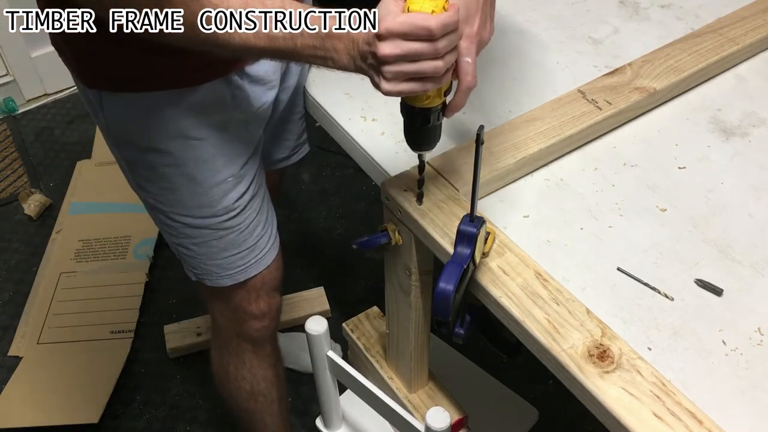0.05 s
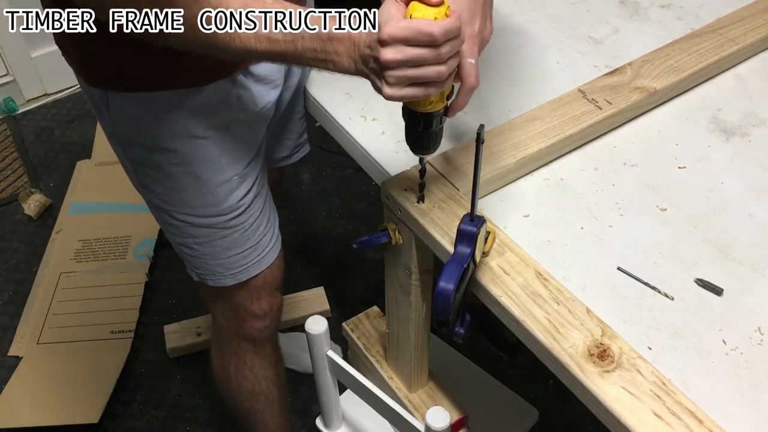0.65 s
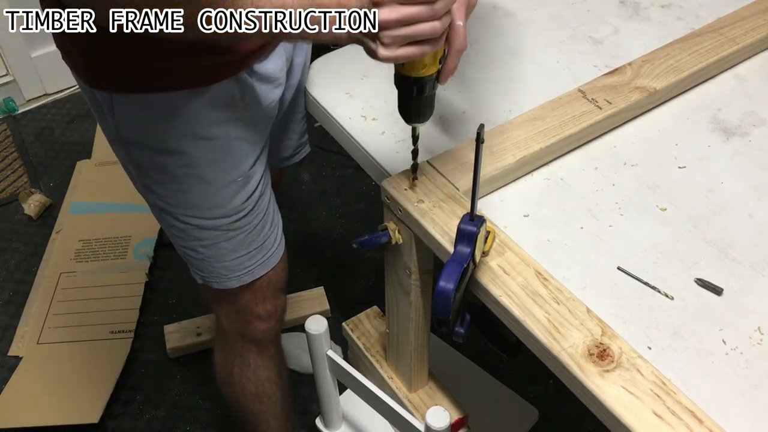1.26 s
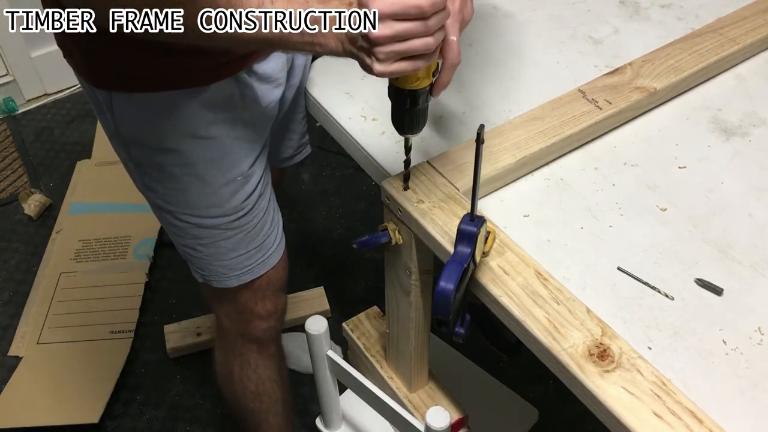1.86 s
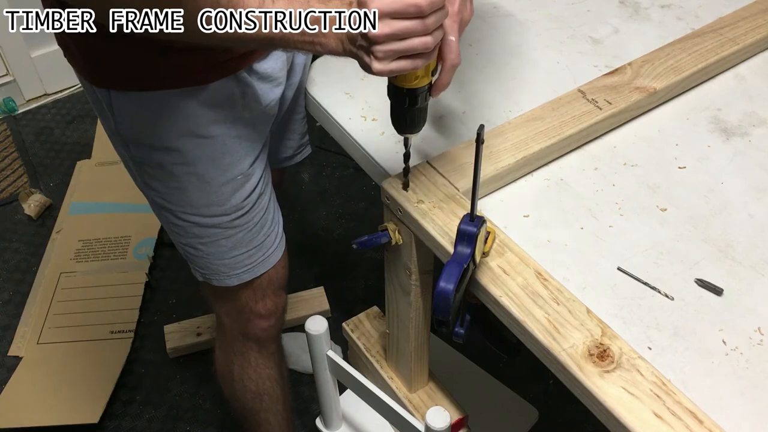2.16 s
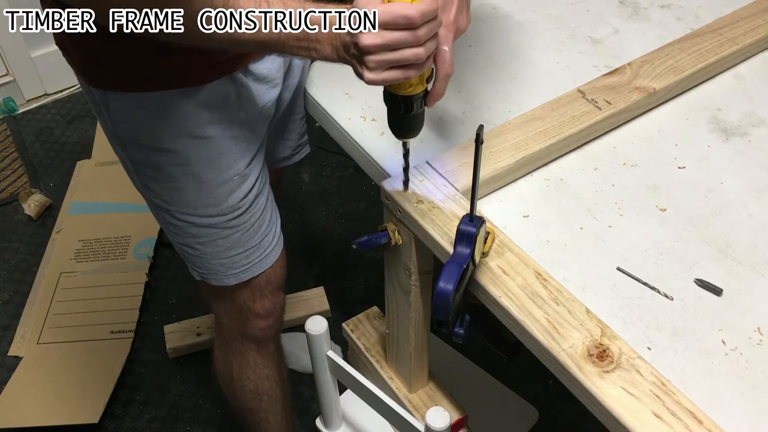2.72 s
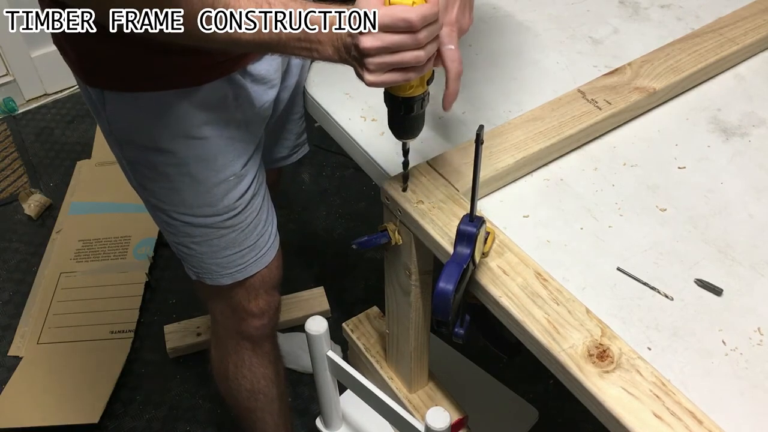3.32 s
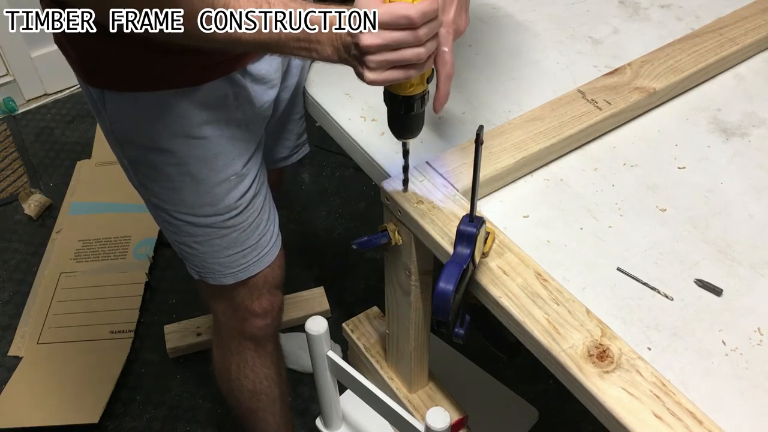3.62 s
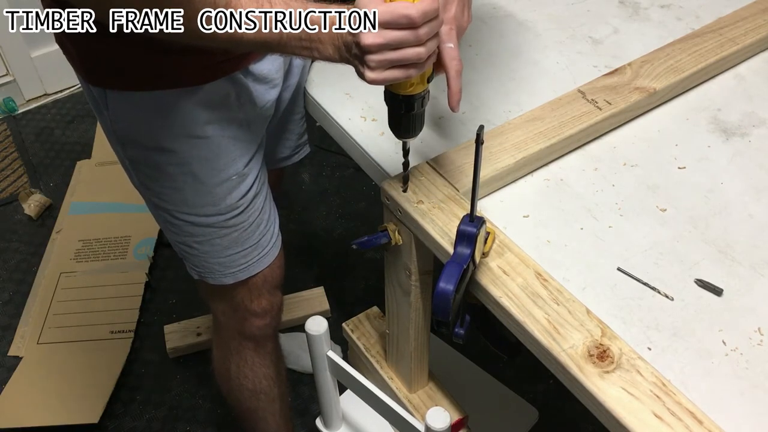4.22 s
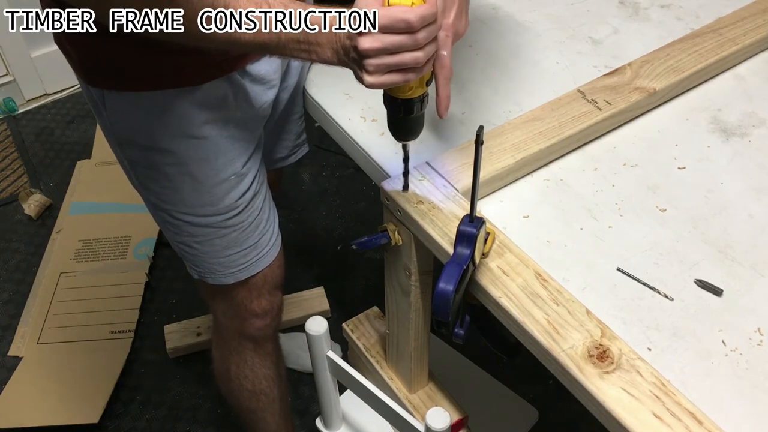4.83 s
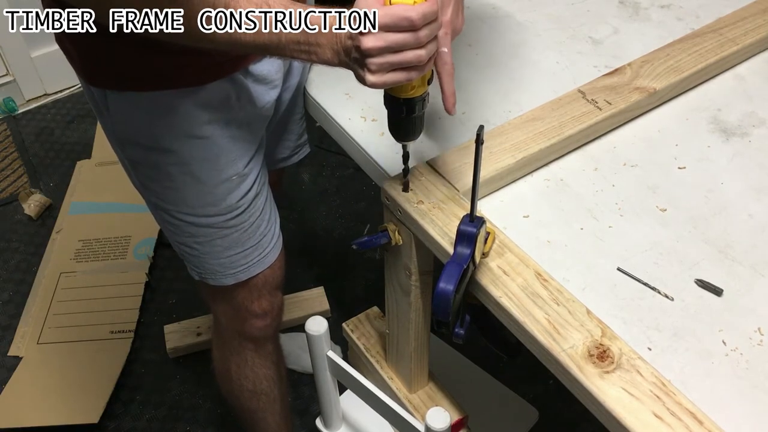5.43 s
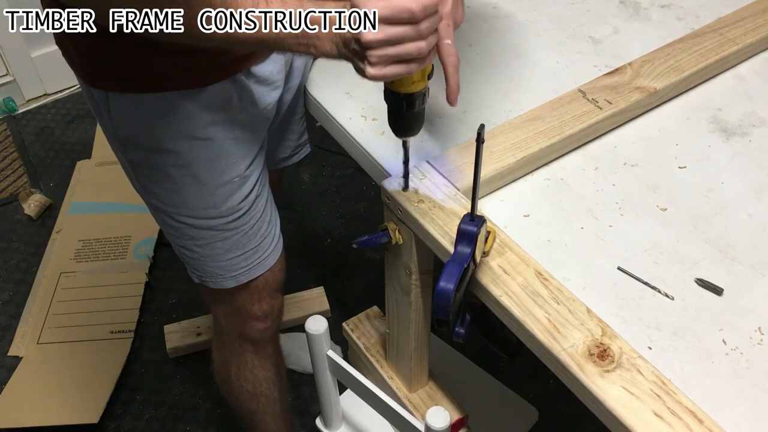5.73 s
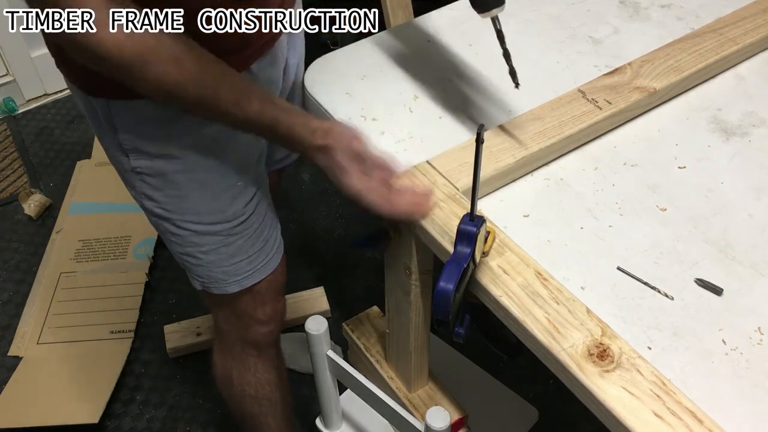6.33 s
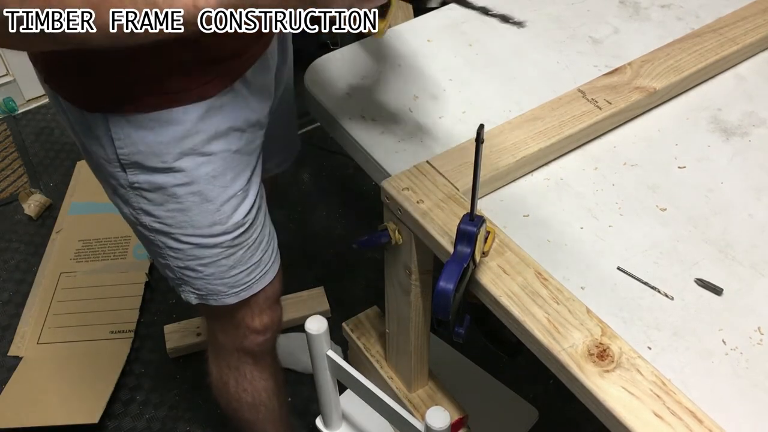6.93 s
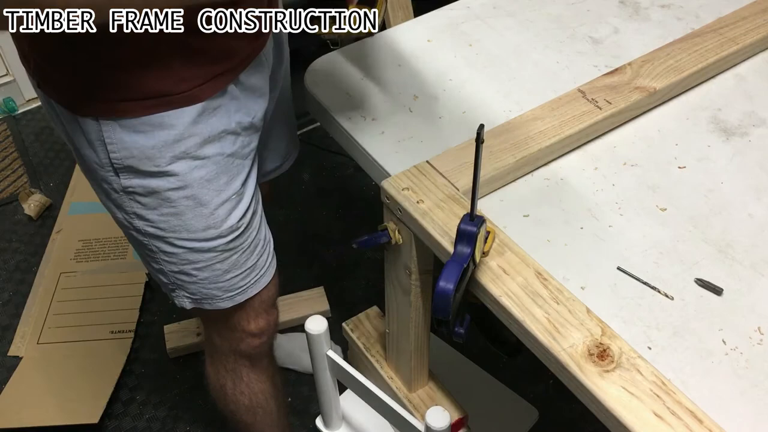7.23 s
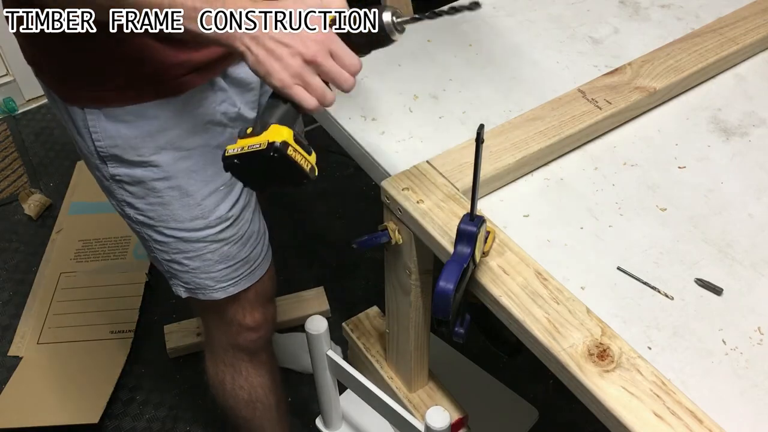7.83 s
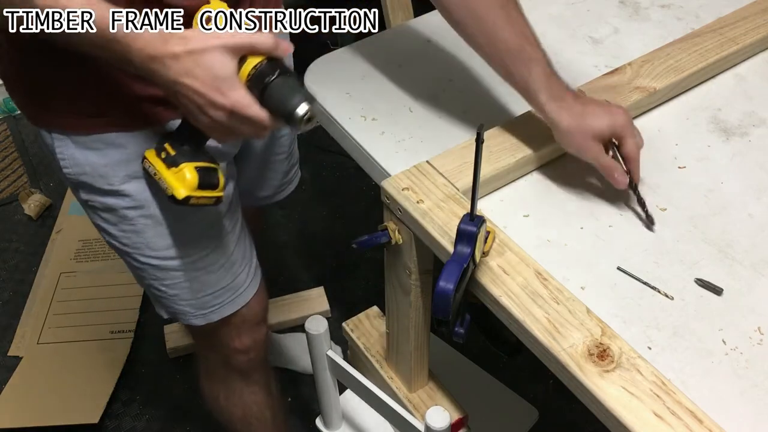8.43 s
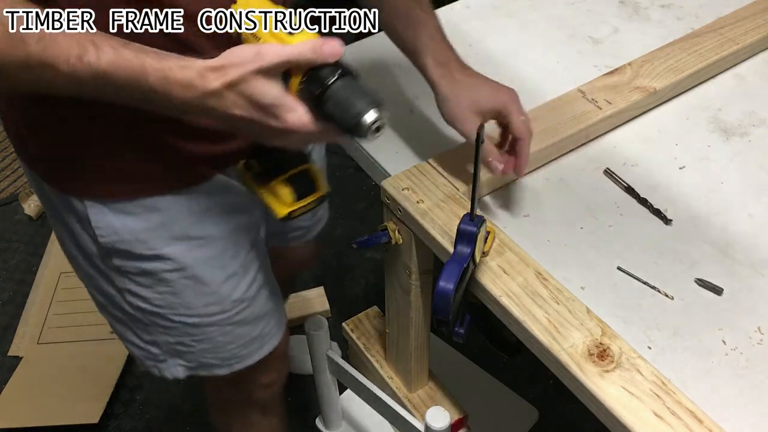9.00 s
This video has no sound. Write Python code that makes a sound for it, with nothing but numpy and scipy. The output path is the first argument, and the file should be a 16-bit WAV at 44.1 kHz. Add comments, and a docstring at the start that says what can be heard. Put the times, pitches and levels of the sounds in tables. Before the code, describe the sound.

A cordless drill whines in short bursts into wood, then its chuck clicks and a steel bit knocks loudly onto a hollow table.

```python
"""A cordless drill whines up close by, countersinking a timber frame clamped to a hollow work table.
Twelve short trigger pulls spin the motor up and let it run down: the gears sing and rattle, and the bit
chatters in the wood and snags twice. Soft noise swells, the chuck clicks loose, and the steel bit is put
down with a loud knock that sets the table booming. One microphone, in a small, live workshop."""
import sys
import numpy as np
from scipy import signal
from scipy.fft import rfft, irfft
from scipy.io import wavfile

SR = 44100
rng = np.random.default_rng(int(sys.argv[2]) if len(sys.argv) > 2 else 0)


def store_pcm(level_fs):
    """Save levels as 16-bit WAV."""
    pcm = np.round(np.clip(level_fs, -1, 1) * 32767).astype(np.int16)
    wavfile.write(sys.argv[1], SR, np.atleast_2d(pcm).T)


N = 399546
T = np.arange(N) / SR


def undb(db):
    """Decibels to gain."""
    return 10 ** (np.asarray(db) / 20)


def unit(x):
    """Scale to rms 1."""
    return x / np.sqrt(np.mean(x ** 2))


def blow(x):
    """Scale a transient to the energy of 5 ms at rms 1."""
    return x * np.sqrt(.005 * SR / np.sum(x ** 2))


def lookup(points, hz):
    """Read (Hz, value) points on a log-frequency axis."""
    point_hz, value = np.transpose(points)
    return np.interp(np.log(np.maximum(hz, 1)), np.log(point_hz), value)


def colour(x, points, size=4096):
    """Minimum-phase filter with the shape of the (Hz, dB) points and unit power gain."""
    gain = undb(lookup(points, np.fft.rfftfreq(size, 1 / SR)))
    cepstrum = irfft(np.log(gain))
    cepstrum[1:size // 2] *= 2
    cepstrum[size // 2 + 1:] = 0
    response = irfft(np.exp(rfft(cepstrum)))
    return signal.fftconvolve(x, response / np.linalg.norm(response))[:len(x)]


def resonance(x, hz, width_hz):
    """Two-pole band-pass."""
    warped_rate = .5 / np.tan(np.pi * min(hz / SR, .45))
    b, a = signal.bilinear([width_hz / hz, 0], [1, width_hz / hz, 1], warped_rate)
    return signal.lfilter(b, a, x)


def soften(x, cutoff_hz):
    """One-pole low-pass: a softer contact has less treble."""
    return signal.sosfilt(signal.butter(1, cutoff_hz, fs=SR, output="sos"), x)


def fade(t60):
    """One second of exponential decay."""
    return np.exp(-np.log(1000) * T[:SR] / t60)


def swell(start, rise, decay):
    """A straight rise from the start time, then an exponential fade."""
    return np.clip((T - start) / rise, 0, 1) * np.exp(-np.maximum(T - start - rise, 0) / decay)


def contact(t60, grit):
    """A sharp push followed by a short burst of rattle, with a flat spectrum."""
    burst = rng.standard_normal(SR) * fade(t60)
    burst *= grit / np.linalg.norm(burst)
    burst[0] += 1
    flattened = irfft(np.exp(1j * np.angle(rfft(burst))))
    return flattened * (T[:SR] < .5)


def ring(modes):
    """Free vibration of (Hz, dB, t60) modes, in alternating polarity."""
    return blow(sum((-1) ** k * undb(db) * fade(t60) * np.sin(2 * np.pi * hz * T[:SR])
                    for k, (hz, db, t60) in enumerate(modes)))


def walk(rate):
    """Random wandering with `rate` steps a second, spread near 1."""
    return np.interp(T * rate, np.arange(N), rng.standard_normal(N)) * np.sqrt(3 / 2)


def grains(rate, spread_db):
    """Random clicks of uneven size, about `rate` a second, rms 1."""
    clicks = (rng.random(N) < rate / SR) * rng.choice([-1, 1], N)
    return unit(clicks * undb(spread_db * np.clip(rng.standard_normal(N), -2, 2)))


def add(out, start, x):
    """Mix x into out from the start time in seconds."""
    i = int(start * SR)
    out[i:i + len(x)] += x[:N - i]


# The air all round the microphone. Each row: frequency in Hz, relative density in dB.
AIR_COLOUR = [(20, -52), (40, -5), (60, 5.5), (120, 3), (250, -7), (500, -16), (1100, -11), (2200, -15.5),
              (5000, -25), (9000, -28), (16000, -39.5)]
# The drone under it. Each row: time in seconds, level in dB.
DRONE_LEVELS = [(0, -57), (1.5, -72), (2.5, -58), (3.5, -55.5), (5, -55.5), (6.5, -55), (7.4, -52),
                (8.5, -53)]

def room_tone():
    """The workshop at rest: faint air noise and a low, wavering drone."""
    air = colour(rng.standard_normal(N), AIR_COLOUR) * undb(.8 * walk(3))
    rumble = resonance(rng.standard_normal(N), hz=46, width_hz=15)
    drone = unit(resonance(rumble, hz=47.1, width_hz=10))
    drone_db = np.interp(T, *np.transpose(DRONE_LEVELS))
    return undb(-62.5) * air + undb(drone_db) * drone


# A swell in the background. Each row: frequency in Hz, relative density in dB.
BACKGROUND_SWELL_COLOUR = [(100, -16), (260, 5), (550, -7), (1200, 0.5), (2500, -5.5), (6000, -15),
                           (16000, -36)]

def background_swell(grain):
    """Soft background noise swells after the drilling and slowly fades."""
    return undb(-62.5) * swell(start=6.7, rise=.7, decay=1.9) * colour(grain, BACKGROUND_SWELL_COLOUR)


# The workshop's reverberation. Each row: frequency in Hz, time to fall 60 dB in seconds.
ROOM_DECAY = [(100, 0.54), (400, 0.7), (1200, 0.57), (3000, 0.47), (6000, 0.53), (10000, 0.4),
              (16000, 0.25)]

def reflections(x):
    """Near walls answer within a few milliseconds; the diffuse tail dies soonest in the high treble."""
    hz, _, bins = signal.stft(rng.standard_normal(SR), SR, nperseg=256)
    age = np.linspace(0, 1, bins.shape[1])
    decay = undb(-60 * age / lookup(ROOM_DECAY, hz)[:, None])
    tail = signal.istft(bins * decay, SR)[1][:SR]
    tail *= np.clip((T[:SR] - .003) / .011, 0, 1)
    return signal.fftconvolve(x, tail / np.linalg.norm(tail))[:N]


# Rubs at the table. Each row: start and length in seconds, level in dB, centre and width in Hz.
RUBS = [(6.003, 0.059, -37, 4160, 1400), (6.375, .11, -51.5, 690, 3030), (6.864, 0.034, -39, 2100, 950),
        (7.09, 0.086, -61.5, 2930, 2200), (7.75, 0.059, -41, 3240, 8000), (7.815, 0.045, -53, 6900, 12000),
        (8.124, 0.024, -36, 2940, 9400), (9.005, .06, -52.5, 380, 350)]

def sliding(friction):
    """Hands and bit slide over chuck and wood with grainy friction; dry skin adds a hiss."""
    skin_hiss = undb(-10) * unit(resonance(friction, hz=11800, width_hz=4300))
    out = np.zeros(N)
    for start, length, db, hz, width_hz in RUBS:
        band = resonance(friction, hz, width_hz)
        scrape = unit(resonance(band, hz, 1.25 * width_hz))
        rise = .54 * length
        out += undb(db) * swell(start, rise, length - rise) * (scrape + skin_hiss)
    return out


def tap(hz):
    """A light, quickly damped tap; loose parts buzz on."""
    push = contact(t60=.014, grit=3.8)
    buzz = .025 * rng.standard_normal(SR) * fade(.62)
    band = resonance(push + buzz, hz, .91 * hz)
    return blow(resonance(band, hz, 1.7 * hz))


# Small contacts around the drill. Each row: start in seconds, level in dB, centre in Hz.
TAPS = [(0.873, -31, 1470), (1.3, -50.5, 3600), (1.391, -45.5, 4480), (1.538, -53.5, 2530),
        (1.706, -55.5, 4499), (1.727, -49, 373), (1.985, -32.5, 2197), (5.73, -41, 9120),
        (6.858, -41.5, 2550), (6.879, -43.5, 2340), (6.93, -43.5, 2300), (7.16, -60, 3800),
        (7.785, -41, 4650), (8.533, -29.5, 2640)]

def light_taps():
    """Bit, chuck and fingers touch lightly during and after the drilling."""
    out = np.zeros(N)
    for start, db, hz in TAPS:
        add(out, start, undb(db) * tap(hz))
    return out


# The bit held in the chuck. Each row: frequency in Hz, relative level in dB, t60 in seconds.
GRIPPED_MODES = [(9100, 0, 1.1), (9140, -1, .9), (9190, -1, .8), (9030, -3, .6), (14900, -5, .3)]

def gripped_bit(shaking):
    """The running drill shakes the steel bit, which rings on thinly into the pauses."""
    return undb(-68) * unit(signal.fftconvolve(shaking, ring(GRIPPED_MODES))[:N])


# The bit once it is loose. Each row: frequency in Hz, relative level in dB, t60 in seconds.
BIT_MODES = [(3400, -9, .15), (5512, -3, .2), (5870, -6, .15), (9150, -1, .22), (10200, -2, .33),
             (11800, -3, .22)]

def bit_clink():
    """Struck steel rings briefly in a few high modes."""
    return ring(BIT_MODES)


# The chuck's bright click. Each row: frequency in Hz, relative density in dB.
CHUCK_COLOUR = [(200, -24), (700, -11), (1500, -13), (3000, -11), (5500, -4), (8000, -8), (10300, -2),
                (12000, -4), (14000, 0), (16000, 0), (17000, -5)]
# Its clicks. Each row: start in seconds, gain in dB, relative steel ring in dB, cut-off in Hz.
CHUCK_CLICKS = [(7.282, -54, -23, 8950), (7.409, -36.5, -27, 2520), (7.526, -27.5, -29, 4770),
                (7.5813, -21.5, -37, 19200), (8.128, -30.5, -7.5, 4000), (8.136, -29, -23, 3950),
                (8.166, -30, -18, 3530)]

def chuck():
    """The chuck clicks open and frees the bit, which rings with each click."""
    out = np.zeros(N)
    for start, db, ring_db, cutoff_hz in CHUCK_CLICKS:
        click = blow(colour(contact(t60=.012, grit=2.5), CHUCK_COLOUR))
        add(out, start, undb(db) * (soften(click, cutoff_hz) + undb(ring_db) * bit_clink()))
    return out


# A knock on the table, heard close by. Each row: frequency in Hz, relative density in dB.
KNOCK_COLOUR = [(35, -47), (60, -19), (136, -4), (417, -3), (785, -4.5), (862, -3), (1380, -12.5),
                (2140, -12.5), (2580, -17), (2770, -14.5), (7750, -29.5), (9790, -32.5), (10800, -38),
                (16000, -45)]
# The table top's modes. Each row: frequency in Hz, relative level in dB, t60 in seconds.
TABLE_MODES = [(123, 3, 0.43), (145, -13, .4), (177.4, 0, 0.29), (228, -3.5, 0.62), (245, -5, 0.54),
               (321.4, 9.5, 0.57), (370, -10, .45), (419, 4, 0.4), (540, -21, 0.49), (612, 6, 0.52),
               (874, -15, 0.36), (1002, 9, 0.24), (1066, -3, 0.32), (2724, 10.5, 0.11)]
# The bit is put down. Each row: start in seconds, gain in dB, cut-off in Hz, relative steel ring in dB.
KNOCKS = [(8.5322, -26, 3480, -50), (8.618, -10.5, 14000, -22), (8.679, -19.5, 11700, -47),
          (9.008, -42, 890, -25)]

def table_knocks():
    """Each blow cracks, the hollow table booms in its main modes and a dense wash, and the bit clinks."""
    out = np.zeros(N)
    for start, db, cutoff_hz, ring_db in KNOCKS:
        crack = blow(colour(contact(t60=.036, grit=2.06), KNOCK_COLOUR))
        wash = blow(colour(rng.standard_normal(SR) * fade(.37), KNOCK_COLOUR))
        body = crack + undb(1) * wash + undb(-3.5) * ring(TABLE_MODES)
        add(out, start, undb(db) * (soften(body, cutoff_hz) + undb(ring_db) * bit_clink()))
    return out


# The crack of a snag. Each row: frequency in Hz, relative density in dB.
SNAG_COLOUR = [(150, -41), (400, -6.5), (650, 3.5), (1500, 4.5), (3200, 3), (5500, -3.5), (8000, -6),
               (11500, -13.5), (14000, -4), (16000, -25)]
# Two snags at the frame, three catches each. Each row: start in seconds, level in dB.
SNAGS = [(1.0282, -21), (1.036, -30), (1.063, -29), (5.9544, -18.5), (5.9598, -24), (5.98, -35)]

def snags():
    """The bit catches on the rim of the hole."""
    out = np.zeros(N)
    for start, db in SNAGS:
        catch = blow(colour(contact(t60=.018, grit=1.7), SNAG_COLOUR))
        add(out, start, undb(db) * catch)
    return out


# The trigger pulls; the first is already under way. Each row: switch time, motor start and run length
# in seconds, top speed in Hz, relative whine and cutting levels in dB.
PULLS = [(-.12, -.06, .2, 351.1, 1, -0.5), (0.324, 0.377, 0.2, 291.8, -6, -2),
         (.798, 0.869, .187, 354.5, -6, -2), (1.9254, 1.985, 0.2, 368.2, -1.5, -0.5),
         (2.286, 2.346, .221, 358, -0.5, 2), (2.68, 2.734, .23, 353.6, 0, 1),
         (3.172, 3.237, 0.22, 349.4, 0.5, -0.5), (3.612, 3.67, 0.23, 348, 0, -1.5),
         (4.351, 4.408, .24, 354, -0.5, -2.5), (4.754, 4.803, .23, 337.7, -2.5, 0),
         (5.243, 5.304, 0.21, 299.3, -6, 0), (5.647, 5.731, .29, 357.8, -5.5, -2.5)]
# The bit leaves the hole while still turning. Each entry: time in seconds.
LIFTS_S = [1.005, 5.875]
SPIN_UP_S, RUN_DOWN_S, TAKE_UP_S = .041, .09, .0028
LET_GO_S, CLEAR_S = .012, .026
FULL_SPEED_HZ, RASP_DB_PER_HZ = 352, .0709

def motor_drive():
    """Each pull spins the motor up and down: its speed, and the rattle, whine, cut and rasp strengths."""
    speed, rattle, whine, cut, rasp = np.zeros((5, N))
    for _, start, length, top_hz, whine_db, cut_db in PULLS:
        age = np.maximum(T - start, 0)
        rise = 1 - np.exp(-age / SPIN_UP_S)
        fall = 1 - np.clip((age - length) / RUN_DOWN_S + 1, 0, 1) ** 3
        speed += top_hz * rise * fall
        torque = np.minimum(age / TAKE_UP_S, 1) * fall ** 1.03
        rattle += torque * (.41 + .23 * rise ** 2)  # starts at once, harder at speed
        whine += undb(whine_db) * (rise * fall ** 2) ** 4.6  # stands out only near top speed
        # the bit bites deeper until it is lifted or the motor is about to stop
        in_wood_s = min([length - LET_GO_S] + [lift - start for lift in LIFTS_S if lift > start])
        engaged = np.clip((in_wood_s - age) / CLEAR_S + .5, 0, 1)
        depth = np.minimum(age / in_wood_s, 1) ** .57 * engaged
        cut += undb(cut_db) * depth
        rasp += undb(-7 + RASP_DB_PER_HZ * (FULL_SPEED_HZ - top_hz)) * depth  # slower pulls rasp more
    return speed, rattle, whine, cut, rasp


def trigger_clicks():
    """The switch clicks, then the slack in the gears closes with a clack as the motor starts."""
    out = np.zeros(N)
    for switch_s, motor_s, *_ in PULLS:
        if switch_s > 0:
            add(out, switch_s, undb(-43) * tap(hz=1900))
            add(out, motor_s, undb(-42) * tap(hz=1290))
    return out


# The frame clamped to the table. Each row: frequency in Hz, relative density in dB.
TIMBER_COLOUR = [(40, -32), (80, -2.5), (115, 3.5), (165, 4), (240, -0.5), (400, -8.5), (700, -5.5),
                 (2000, -38.5), (8000, -44)]

def cutting(cut, rasp):
    """The bit chatters against the timber and rasps through its fibres."""
    chatter = colour(cut * grains(420, spread_db=3), TIMBER_COLOUR)
    tearing = resonance(grains(2500, spread_db=1), hz=2280, width_hz=2100)
    fibres = unit(resonance(tearing, hz=1960, width_hz=2500))
    return undb(-39.5) * chatter + undb(-35.5) * rasp * fibres


# The gearbox heard through its housing. Each row: frequency in Hz, relative density in dB.
HOUSING_COLOUR = [(150, -21), (400, -13.5), (900, 1.5), (1500, -1), (2300, -4), (3200, -3), (4200, -2),
                  (5900, 2.5), (7200, -4.5), (9300, -3), (10500, -13), (14000, -5), (16000, -20.5)]

def gear_rattle(speed, turns, harmonics=54):
    """Loose teeth rattle the housing; their errors come round with every turn of the planet gears."""
    planet_angle = 2 * np.pi * turns * 5 / 6
    phases = rng.uniform(0, 2 * np.pi, harmonics)
    tooth_errors = sum(np.cos(k * planet_angle + phase) for k, phase in enumerate(phases, 1))
    tooth_errors *= undb(1.5 * walk(200)) * np.sqrt(2 / harmonics)
    loose_teeth = grains(7000, spread_db=4.5) * (1 + .29 * np.sin(planet_angle))
    gears = colour(loose_teeth + undb(-2.5) * tooth_errors, HOUSING_COLOUR)
    # slow teeth only growl in the midrange; treble and bass open with speed
    growl = 1.5 * resonance(gears, hz=1650, width_hz=1200)
    openness = np.minimum(speed / 340, 1) ** .2
    return growl + openness * (gears - growl)


# The buzz of the gears. Each row: multiple of motor speed, relative level in dB, flutters per second.
MESH_BANDS = [(8.93, -2, 900), (17.75, -23, 900), (27.9, -21, 590), (36.64, -10, 500)]

def gear_mesh(turns):
    """Teeth mesh roughly, making bands of noise that follow the motor's speed."""
    out = np.zeros(N)
    for multiple, db, rate in MESH_BANDS:
        phase = 2 * np.pi * multiple * turns
        out += undb(db) * (walk(rate) * np.sin(phase) + walk(rate) * np.cos(phase))
    return out


# The whine, straight from the motor vents. Each row: multiple of motor speed, relative level in dB.
WHINE_TONES = [(2.5, -5.5), (3.33, -26), (9, -2.5), (10, 1), (17, 1.5), (18, 3), (20, -13), (27.4, -2),
               (36.5, -17), (40, -19)]

def motor_whine(turns):
    """Gears and fan sing at multiples of the motor's speed, each tone flickering in level."""
    return sum(undb(db + 2 * walk(90)) * np.sin(2 * np.pi * multiple * turns)
               for multiple, db in WHINE_TONES)


def drill():
    """One slightly unsteady motor drives it all: returns the whine, and the grind of gears and bit."""
    speed, rattle, whine, cut, rasp = motor_drive()
    turns = np.cumsum(speed * (1 + .009 * walk(500))) / SR
    tones = undb(-38.3) * whine * motor_whine(turns)
    buzz = undb(-42) * np.sqrt(rattle) * gear_mesh(turns)
    wood = cutting(cut, rasp)
    clatter = undb(-34) * rattle * gear_rattle(speed, turns)
    return tones, buzz + wood + clatter


def scene():
    """At the microphone, near the table: direct sound leads, with reflections and room tone behind."""
    whine, grind = drill()
    table = table_knocks()
    small = trigger_clicks() + light_taps() + snags() + chuck() + gripped_bit(grind)
    grain = grains(1500, spread_db=5)
    small += sliding(grain) + background_swell(grain)
    # the whine beams from the vents, so it stirs the room less than the grind
    spill = undb(-10) * whine + undb(-5.5) * grind + undb(-8.5) * small + undb(-12.5) * table
    return (whine + grind + small + table + reflections(spill) + room_tone())[None]


def record(dry):
    """The mono microphone drops the deepest bass and the very top."""
    low_cut = signal.butter(2, 28, "high", fs=SR, output="sos")
    high_cut = signal.ellip(8, .2, 70, 16300, fs=SR, output="sos")
    return signal.sosfilt(high_cut, signal.sosfilt(low_cut, dry))


dry = scene()
out = record(dry)
store_pcm(out)
```